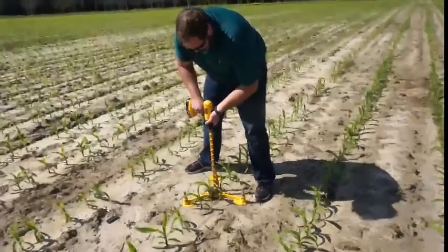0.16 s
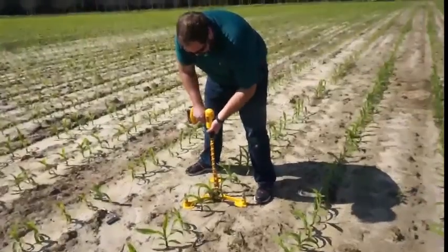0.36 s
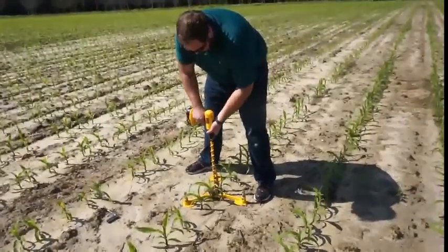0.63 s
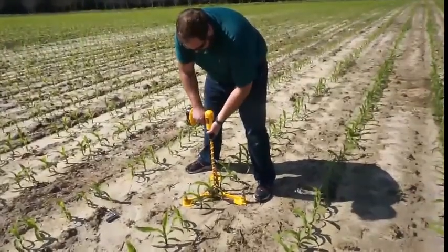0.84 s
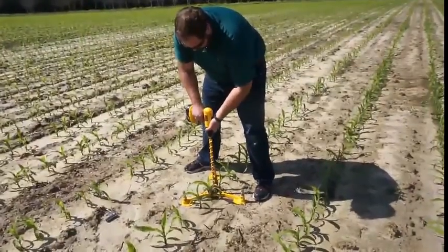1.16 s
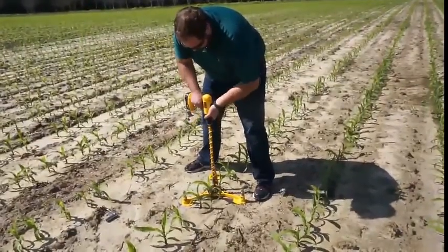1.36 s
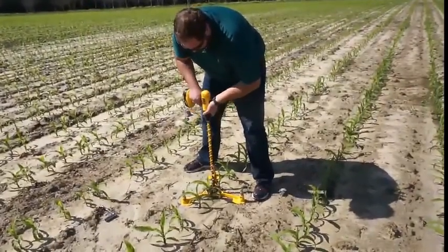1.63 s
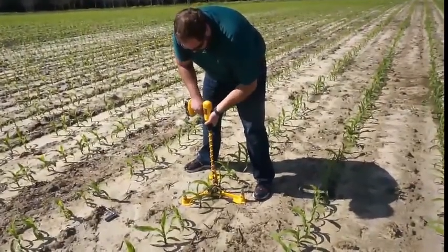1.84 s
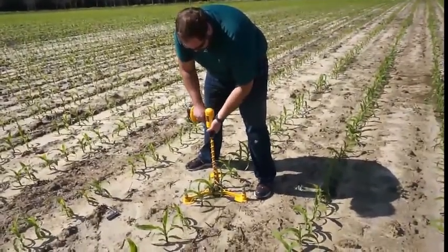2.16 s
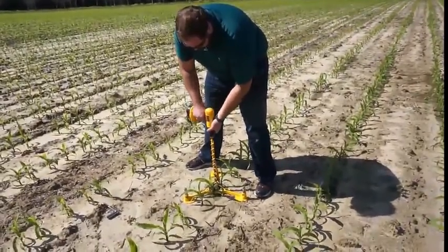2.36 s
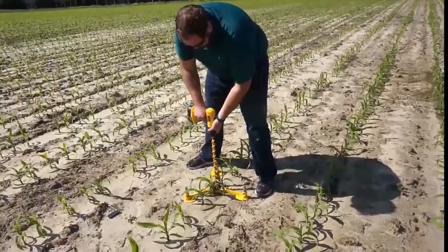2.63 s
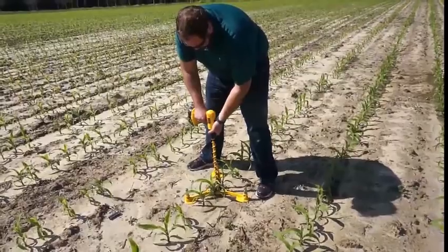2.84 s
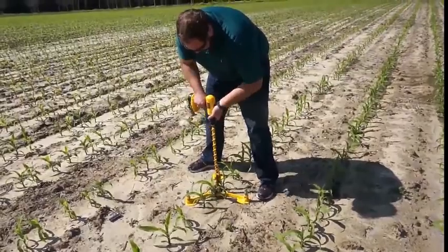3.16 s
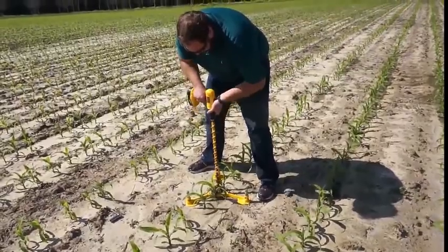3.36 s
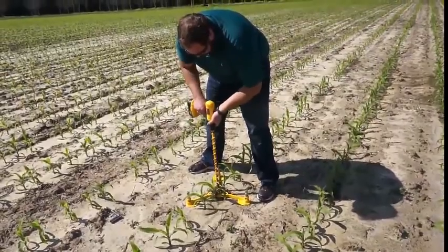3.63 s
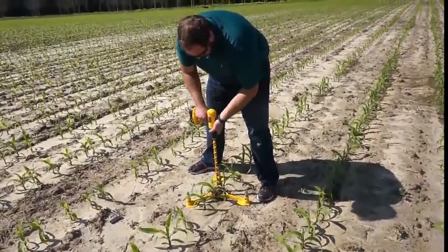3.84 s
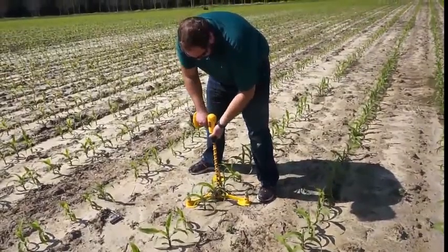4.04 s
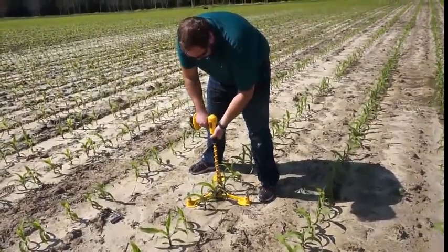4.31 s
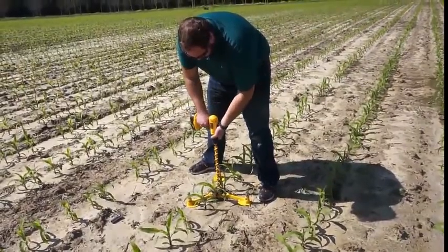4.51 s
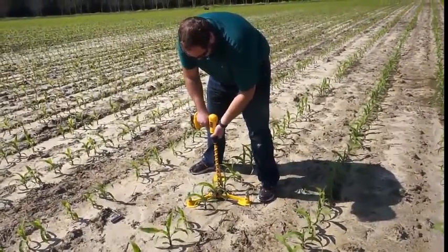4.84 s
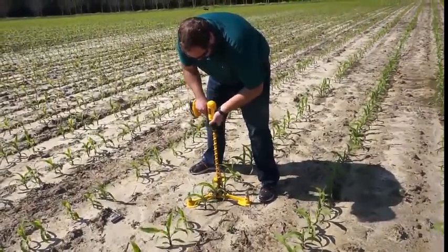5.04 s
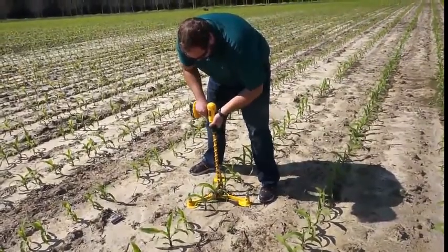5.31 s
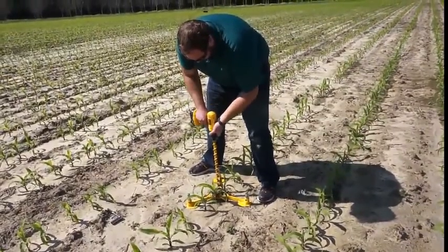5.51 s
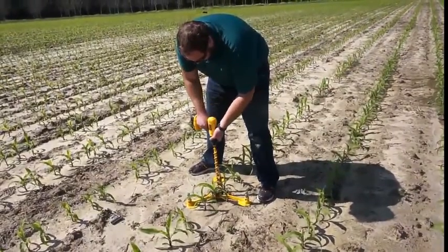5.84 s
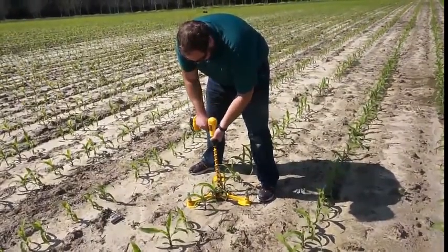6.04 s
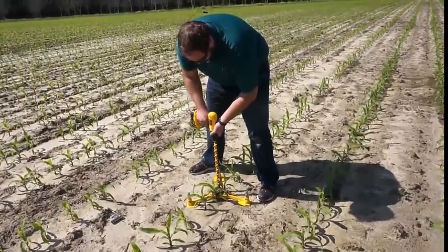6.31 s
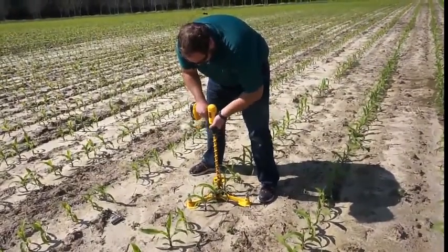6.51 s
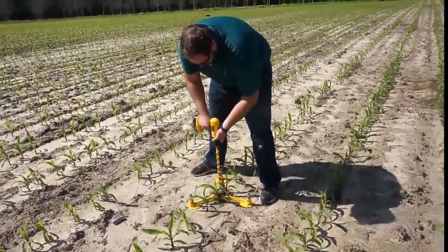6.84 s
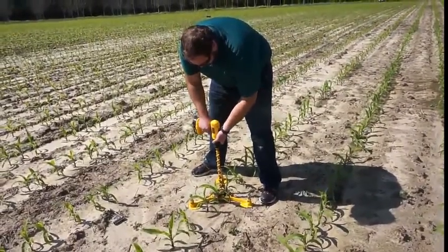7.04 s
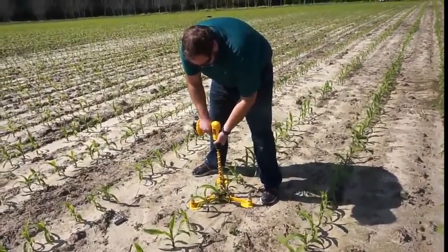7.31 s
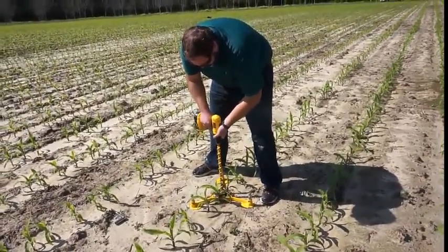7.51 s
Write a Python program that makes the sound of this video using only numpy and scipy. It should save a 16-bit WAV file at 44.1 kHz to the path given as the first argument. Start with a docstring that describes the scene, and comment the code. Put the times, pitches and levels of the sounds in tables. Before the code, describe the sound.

A cordless drill whirs in uneven bursts outdoors, its motor pitch rising and sagging over gritty sand hiss, while low wind buffets the microphone.

```python
"""Auger drill in sand

A few metres from a camera in an open field, a cordless drill turns a long auger into sandy soil in short strokes.
Motor slots and gear teeth sing as sines on multiples of the shaft angle, over filtered noise for brush and sand;
the housing colours them all, and the gears knock now and then as short damped rings.
Two dry noise clicks fall near the start, a thin sine whistle comes and goes, and gusts of low noise buffet
both microphone ports. The camera's gain control ducks after loud peaks."""
import sys
import numpy as np
from scipy import signal
from scipy.fft import rfft, irfft, next_fast_len
from scipy.io import wavfile
from scipy.ndimage import uniform_filter1d, map_coordinates

SR = 44100
rng = np.random.default_rng(int(sys.argv[2]) if len(sys.argv) > 2 else 0)


def digitize_waveform(pressure):
    """Quantize a signal to 16-bit integers and store it at the path in sys.argv[1].

    Rows of a 2-D input are taken as channels; values are limited to [-1, 1].
    """
    field = np.atleast_2d(pressure).T
    bounded = np.clip(field, -1, 1)
    quanta = np.round(bounded * 32767).astype(np.int16)
    wavfile.write(sys.argv[1], SR, quanta)


N = 338247  # samples
START_SPEED = 175  # shaft turns a second
LEFT_RIGHT = np.array([[1], [-1]])  # signs for a level offset between the ports


def amp(db):
    """Decibels to amplitude."""
    return 10 ** (np.asarray(db) / 20)


def unit(x):
    """Scale to an RMS of one."""
    return x / np.sqrt(np.mean(x ** 2) + 1e-20)


def along(points, hz):
    """Read (f/Hz, value) points on a log frequency axis."""
    f, v = np.transpose(points)
    return np.interp(np.log(hz + 1), np.log(f + 1), v)


def curves(rows):
    """One value per sample for each column after the time."""
    s, *cols = np.transpose(rows)
    return [np.interp(np.arange(N) / SR, s, c) for c in cols]


def wobble(rate):
    """A smooth random curve, rate knots a second."""
    coarse = np.arange(0, N, 32)
    knots = rng.standard_normal(int(N * rate / SR) + 4)
    return np.interp(np.arange(N), coarse, map_coordinates(knots, [coarse * rate / SR]))


def filtered(x, response):
    """Multiply the spectrum of x by a function of frequency."""
    m = next_fast_len(x.shape[-1] + 8192)
    return irfft(rfft(x, m) * response(np.fft.rfftfreq(m, 1 / SR)), m)[..., :x.shape[-1]]


def spread(pair, colour, alike, lead):
    """Two unrelated signals become left and right of given likeness and phase lead."""
    m = next_fast_len(pair.shape[1] + 8192)
    hz = np.fft.rfftfreq(m, 1 / SR)
    turn = np.arccos(np.clip(along(alike, hz), -1, 1)) / 2
    mid, side = rfft(pair, m) * colour(hz) * [np.cos(turn), np.sin(turn)]
    shift = np.exp(.5j * along(lead, hz))
    return irfft([(mid + side) * shift, (mid - side) / shift], m)[:, :pair.shape[1]]


def patchy(patchy_db):
    """Two noises that share patches of random gain in time and frequency."""
    z = signal.stft(rng.standard_normal((2, N)), nperseg=512)[2]
    field = uniform_filter1d(rng.standard_normal(z.shape[1:]), 4, 0)
    field = uniform_filter1d(field, 10, 1)
    return unit(signal.istft(z * amp(patchy_db * unit(field)), nperseg=512)[1][:, :N])


def tones(orders, turns, waver_db):
    """Sines on multiples of the shaft angle, each fluttering by itself; two mixes with other phases."""
    out = np.zeros((2, N))
    for k, db in orders:
        flutter_db = waver_db * (wobble(6) + 1.5 * wobble(70))
        tone = amp(db + flutter_db) * np.exp(2j * np.pi * k * turns)
        out += (tone * np.exp(2j * np.pi * rng.random((2, 1)))).real
    return unit(out)


# Drill as it reaches the camera: t/s, level/dB at the starting speed
DRILL_LEVEL = [(0, -40), (.5, -40.5), (.7, -42.5), (1.2, -41.5), (1.7, -39), (2.15, -38.5), (2.7, -39.5),
               (3.05, -39.5), (3.4, -36.5), (4, -36.5), (4.3, -36.5), (4.6, -38), (4.9, -36.5),
               (5.4, -36.5), (6, -37.5), (6.6, -35.5), (7.2, -35), (7.67, -35.5)]
# Tone of the housing: f/Hz, level/dB
HOUSING_TONE = [(600, -47.5), (880, -1), (1100, -1), (1400, 0), (1650, -6), (1900, -7.5), (2500, -5),
                (3600, 1.5), (4800, 0.5), (6300, -1), (8000, -4), (9800, -1.5), (11200, -12)]
# Likeness of the drill at the two ports: f/Hz, likeness 0-1
DRILL_ALIKE = [(800, 1), (1200, 0.14), (2500, 0.67), (5200, 0.75), (10900, 1)]
# Lean of the drill to one side: f/Hz, level/dB of left over right
DRILL_LEAN = [(700, -10.5), (1080, 10), (1900, 0.5), (3440, -0.5), (6120, 3), (10900, -0.5)]
HISS_DB_PER_OCTAVE = 2.5  # the drill's overall level grows with shaft speed


def drill():
    """Slot, gear and chatter tones join pulsing hiss and grind, and leave through the housing."""
    speed, (hum_db, slot_db, mesh_db, second_db, third_db, grind_db) = shaft()
    turns = np.cumsum(speed * (1 + .002 * wobble(70))) / SR
    source = brush_and_sand(turns, grind_db)
    source += filtered(song(speed, turns, hum_db, slot_db, mesh_db), gearbox)
    # the gearbox colours the chatter only a little
    source += filtered(chatter(speed, second_db, third_db), lambda hz: gearbox(hz) ** 0.25)
    colour = lambda hz: amp(along(HOUSING_TONE, hz))
    body = unit(housing_gaps(spread(source, colour, DRILL_ALIKE, lead=[(1, 0)])))
    level_db = curves(DRILL_LEVEL)[0] + HISS_DB_PER_OCTAVE * np.log2(speed / START_SPEED)
    return amp(level_db) * filtered(body, lambda hz: amp(along(DRILL_LEAN, hz) / 2 * LEFT_RIGHT))


# The trigger finger moves or the auger bites: t/s, shaft speed it settles at [turns a second],
# time constant [s], motor pulling 1 or slack 0
TRIGGER_MOVES = [(0.0, 180.8, .04, 1), (.25, 180.3, .1, 1), (0.51, 91, .171, 0), (1.046, 183.5, .144, 1),
                 (1.75, 178.3, .1, 1), (2.095, 43.7, .215, 0), (2.439, 99.5, .23, 0), (2.876, 166, .138, 1),
                 (4.001, 64.7, .186, 0), (4.366, 134.8, .038, 0), (4.659, 155.5, .152, 0),
                 (4.85, 218.2, .105, 1), (5.4, 214, .1, 1), (5.804, 143.2, .108, 0), (6.198, 212, .151, 1),
                 (6.97, 106, .159, 0), (7.365, 308, .267, 1)]
# Parts of the drill after each of those moves, level/dB re hiss before the speed terms and the housing:
# slot hum, slot overtones, gear tone, second chatter overtone, third chatter overtone, low grind
MOVE_VOICING = [(-11, -7, -8.5, -18, -21, 5), (-5, -8, -4, -13, -18, 2.5), (3.5, -16, -10, -12, -12, 2),
                (-5, -8, -13, -30, -30, 2.5), (-8, -7, -6.5, -29, -30, 2.5), (-8, -14, -11, -5, -12, 3.5),
                (-20, -18, -30, -5, -18, 7), (-6, -14, -8, -18, -26, 3), (-10, -16, -11, -13, -15, 2),
                (-12, -16, -10, -8, -8, 4), (-12, -11, -11, -15, -18, 2), (-10.5, -8, -10, -18, -22, 3),
                (-11.5, -11, -15, -22, -25, 3), (-9, -8, -7, -6, -15, 1.5), (-8, -8, -13, -20, -24, 3.5),
                (-9.5, -11, -9, -5, -16, 2), (-9, -9, -9, -17, -20, 1)]
# the teeth go slack or take up load this long after a move, blended over this time
SLACK_LAG_S, TAKE_UP_S, SLACK_BLEND_S = .05, .09, .06


def shaft():
    """Speed glides to each new setting like a critically damped mass; also the part levels."""
    t, speed = np.arange(N) / SR, np.zeros(N)
    now, slope = START_SPEED, 0
    starts = [row[0] for row in TRIGGER_MOVES]
    for (s, goal, tau, *_), end in zip(TRIGGER_MOVES, starts[1:] + [N / SR]):
        push = slope + (now - goal) / tau
        glide = lambda d: goal + (now - goal + push * d) * np.exp(-d / tau)
        span = (t >= s) & (t < end)
        speed[span] = glide(t[span] - s)
        length = end - s
        now, slope = glide(length), (slope - push * length / tau) * np.exp(-length / tau)
    changes = [row[0] + (TAKE_UP_S if row[3] else SLACK_LAG_S) for row in TRIGGER_MOVES]
    row = np.clip(np.searchsorted(changes, t) - 1, 0, None)
    part_db = np.array(MOVE_VOICING, float)[row].T
    part_db = uniform_filter1d(part_db, max(round(SLACK_BLEND_S * SR), 1), mode="nearest")
    return np.maximum(speed, 1), part_db


# Overtones of the five armature slots: multiple of the shaft, level/dB
SLOT_OVERTONES = [(10, -6), (15, 1), (20, 3.5), (25, 0.5), (30, -3.5), (35, 0), (40, 3), (45, 2.5), (50, 0),
                  (55, -2), (60, 3)]
# Twelve-tooth pinion with a sideband and a second gear: multiple of the shaft, level/dB
GEAR_MESH = [(7, -8), (12, 0), (12.55, -4), (17, -20)]
MESH_DB_PER_OCTAVE = 9  # the gear tone grows with shaft speed


def song(speed, turns, hum_db, slot_db, mesh_db):
    """Armature slots and meshing gears sing at multiples of the shaft speed."""
    # 1 when the speed changes by 150 turns a second each second
    gliding = np.abs(uniform_filter1d(np.gradient(speed), SR // 20)) * SR / 150
    mesh_db = mesh_db + MESH_DB_PER_OCTAVE * np.log2(speed / START_SPEED)
    out = amp(hum_db) * tones([(5, 0)], turns, waver_db=1.5)
    # slot overtones fade while the speed glides
    out += amp(slot_db - 4.5 * gliding) * tones(SLOT_OVERTONES, turns, waver_db=1.5)
    return out + amp(mesh_db) * tones(GEAR_MESH, turns, waver_db=1.5)


# Chattering teeth, a list for the second overtone and one for the third and up:
# multiple of the shaft, level/dB
TOOTH_CHATTER = [(23.3, -9), (24, 0), (24.6, -4), (25.2, -10)], [(35.3, -10), (36, 0), (48, -9)]
CHATTER_DB_PER_OCTAVE = -8  # slack teeth rattle harder as the shaft slows


def chatter(speed, second_db, third_db):
    """Chattering teeth on an unsteady shaft: a broad second overtone and thinner higher ones."""
    slowing_db = CHATTER_DB_PER_OCTAVE * np.log2(speed / 130)
    loaded = np.cumsum(speed * (1 + .01 * wobble(140))) / SR
    firm = np.cumsum(speed * (1 + .007 * wobble(100))) / SR
    second, third = TOOTH_CHATTER
    out = amp(second_db + slowing_db) * tones(second, loaded, waver_db=2.0)
    return out + amp(third_db + slowing_db) * tones(third, firm, waver_db=2.0)


# Gearbox resonances that lift a tone passing through: f/Hz, width/Hz, level/dB re the flat part
GEARBOX_RINGS = [(910, 1000, -27), (2540, 580, 2.5), (3900, 120, -17), (5004, 260, 18), (6260, 330, 11),
                 (10090, 560, 13)]


def gearbox(hz):
    """Gain of the gearbox: resonant peaks on a flat floor."""
    peaks = [amp(db) / 2 / (1 + (2 * (hz - c) / w) ** 2) for c, w, db in GEARBOX_RINGS]
    return 0.5 + sum(peaks)


def brush_and_sand(turns, grind_db):
    """Brush and sand hiss pulses with the shaft and with sand grains; patchier grinding lies below it."""
    beat = 1 + 0.035 * np.cos(2 * np.pi * turns)
    grains = amp(0.54 * wobble(300) + 0.32 * wobble(16))
    noise = unit(patchy(patchy_db=2.5) * beat * grains)
    lows = lambda hz: 1 / (1 + (hz / 3200) ** 12)
    hiss = filtered(noise, lambda hz: 1 - lows(hz))
    return hiss + amp(grind_db) * filtered(patchy(patchy_db=4.0), lows)


# Gaps from ground and body echoes with the drill held high: f/Hz, width/Hz
HIGH_GAPS = [(760, 130), (1110, 200), (2010, 80), (2720, 90), (3130, 380), (5650, 80), (7450, 130),
             (8400, 110), (9350, 80), (10350, 125)]
# The same gaps with the drill sunk low: f/Hz, width/Hz
LOW_GAPS = [(740, 130), (1110, 160), (2060, 90), (2800, 130), (3340, 290), (5800, 90), (6950, 170),
            (7900, 90), (8900, 230), (10300, 60)]
# Drill sinking into the ground: t/s, share of the low position 0-1
SINK_PATH = [(0, 0.1), (2.2, 0.2), (3.4, 1), (7.67, 0.96)]


def housing_gaps(x):
    """Dark gaps where two paths cancel; they slide as the drill sinks and sway as it rocks."""
    hz, t, z = signal.stft(x, SR, nperseg=1024)
    at = np.minimum(np.round(t * SR).astype(int), N - 1)
    low = np.clip(curves(SINK_PATH)[0][at], 0, 1)
    for (high_hz, high_w), (low_hz, low_w) in zip(HIGH_GAPS, LOW_GAPS):
        centre = high_hz + low * (low_hz - high_hz) + 45 * wobble(6)[at]
        width = (high_w + low * (low_w - high_w)) * amp(2.2 * wobble(12)[at])
        depth = np.clip(1.2 + .4 * wobble(8)[at], 0, 1)  # the gap varies in depth
        z = z * (1 - depth / (1 + (2 * (hz[:, None] - centre) / width) ** 6))
    return signal.istft(z, SR, nperseg=1024)[1][:, :N]


# Short knocks in the gear train: t/s, level/dB before onset, decay and lean, f/Hz
GEAR_KNOCKS = [(0.559, -7, 856), (2.13, -8, 956), (4.001, -7, 980), (4.498, -10.5, 1456), (4.8, -16, 910)]


def knocks():
    """Each knock is one damped ring with a soft start, a little stronger on the left."""
    out, t = np.zeros(N), np.arange(SR // 10) / SR
    for s, db, hz in GEAR_KNOCKS:
        decay = amp(db - 60 * t / 0.02)  # 60 dB in 20 ms
        out[round(s * SR):][:len(t)] += decay * (1 - np.exp(-t / 0.019)) * np.sin(2 * np.pi * hz * t)
    return out * amp(1.5 * LEFT_RIGHT)


# Dry clicks: t/s, peak level/dB on the right, brightness [dB an octave]
DRY_CLICKS = [(0.0635, -5.5, 1), (0.285, -12, -2)]
# Spectrum of a click before its brightness: f/Hz, level/dB per Hz
CLICK_TONE = [(400, -35), (800, -9), (1200, -7), (1850, -23), (2750, -6), (3450, -27), (4300, -5.5),
              (5600, -2), (6900, -3), (8000, -19), (9550, -2), (11000, -30), (14600, -55), (22000, -120)]
CLICK_LEFT_DB = -8  # re right: the clicks fall near the right port


def clicks():
    """Dry noise snaps that swell for under a millisecond and die in three."""
    out, t = np.zeros((2, N)), np.arange(SR // 50) / SR
    lead_in = 200  # samples of room for the filter before the click
    for s, db, bright_db in DRY_CLICKS:
        burst = rng.standard_normal((2, len(t))) * (t / .0007) ** 2 * np.exp(-t / 0.0004)
        burst = np.pad(burst, ((0, 0), (lead_in, 0)))
        colour = lambda hz: amp(along(CLICK_TONE, hz) + bright_db * np.log2((hz + 1) / 4000))
        burst = filtered(burst, colour)
        burst = burst / abs(burst).max(1, keepdims=True) * amp([[CLICK_LEFT_DB], [0]])
        out[:, round(s * SR) - lead_in:][:, :burst.shape[1]] += amp(db) * burst
    return out


# Thin whistle: t/s, f/Hz, level/dB
WHISTLE_PATH = [(0.0, 4260, -42), (0.06, 4260, -43.5), (0.08, 4223, -59), (0.38, 4239, -53.5),
                (0.7, 4250, -56.5), (1.3, 4190, -52), (1.34, 4200, -60), (1.56, 4270, -44),
                (1.73, 4180, -53), (2.01, 4230, -49), (2.05, 4220, -59), (2.84, 4280, -57),
                (2.95, 4185, -42), (3.29, 4340, -53.5), (3.53, 4310, -48), (3.61, 4234, -71),
                (3.82, 4270, -48), (3.87, 4220, -53), (4.02, 4260, -47), (4.66, 4207, -44),
                (4.89, 4200, -59), (4.98, 4230, -39), (5.02, 4170, -50), (5.57, 4259, -67),
                (5.72, 4210, -50), (6.77, 4190, -53.5), (6.81, 4140, -41), (6.92, 4160, -60),
                (7.26, 4130, -51), (7.35, 4179, -61), (7.41, 4160, -39.5), (7.58, 4190, -54),
                (7.61, 4180, -40), (7.67, 4169, -49)]


def whistle():
    """A thin flickering sine that keeps near its pitch whatever the shaft does."""
    hz, db = curves(WHISTLE_PATH)
    tone = np.sqrt(2) * np.sin(2 * np.pi * np.cumsum(hz + 9 * wobble(16)) / SR)
    flicker = unit(amp(2.9 * wobble(25)))
    return amp(db) * flicker * tone * amp(.6 * LEFT_RIGHT)


# Breeze over the field: t/s, level/dB, brightness of the eddies [dB an octave]
BREEZE_PATH = [(0, -21, 2), (.15, -23, 0), (1.1, -30, -4), (1.5, -24, 1.5), (1.9, -28, 1), (2.5, -30, -3.5),
               (2.95, -26.5, 3), (3.15, -33, -10), (3.85, -31.5, -2.5), (4.05, -25.5, -1),
               (4.75, -26.5, -1), (5.3, -33, -0.5), (5.6, -35.5, -0.5), (6.15, -30.5, -5), (6.45, -44, -11),
               (7.1, -27.5, -7), (7.4, -34.5, -7), (7.67, -33.5, 4)]
# Spectrum of the rumble before its low-pass filters: f/Hz, level/dB per Hz
RUMBLE_TONE = [(12, -22), (20, -16), (87, 0), (193, -2), (251, -5), (481, -15), (552, -12.5), (686, -25),
               (800, -73), (1040, -76), (1760, -120)]
# Wind at the two ports: f/Hz, left-right likeness 0-1
WIND_ALIKE = [(30, 0.88), (70, 0.7), (130, 0.55), (270, 0.72), (550, 0.84)]
# Wind crossing the ports: f/Hz, phase by which the left port leads [radians]
WIND_LEAD = [(40, 0), (75, -.25), (130, -1.3), (300, -2.3), (690, -2.7)]
DEEP_FOLLOWS = 0.22  # share of the breeze's dB swing that the deepest rumble follows


def wind():
    """A low rumble whose upper part comes in lumps, and short eddies that hit the ports out of step."""
    breeze_db, tilt_db = curves(BREEZE_PATH)
    colour = lambda hz: amp(along(RUMBLE_TONE, hz)) / (1 + (hz / 520) ** 8)
    rumble = unit(spread(rng.standard_normal((2, N)), colour, WIND_ALIKE, WIND_LEAD))
    deep = filtered(rumble, lambda hz: 1 / (1 + (hz / 85) ** 4))
    lumps = unit(amp(np.minimum(3.55 * wobble(16) + 3.35 * wobble(35), 6)))
    steadying = amp((DEEP_FOLLOWS - 1) * (breeze_db - breeze_db.mean()))
    out = amp(breeze_db) * (steadying * deep + lumps * (rumble - deep))
    out += eddies(breeze_db, tilt_db)
    return filtered(out, lambda hz: 1 / (1 + (hz / 760) ** 10))


# Eddies at set moments: t/s, level/dB before lean and low-pass, length/s
SET_EDDIES = [(0.05, -19, 0.037), (0.091, -13.5, 0.034), (0.292, -21, 0.022), (0.351, -16, 0.018),
              (0.459, -25, 0.04), (0.519, -14, 0.077), (0.688, -19, 0.027), (0.784, -18.5, 0.017),
              (1.078, -19, 0.052), (1.148, -25, 0.012), (1.402, -20, 0.033), (1.44, -25, 0.03),
              (1.544, -19, 0.048), (1.85, -22.5, 0.028), (1.886, -22, 0.025), (2.335, -22, 0.025),
              (2.488, -18.5, 0.025), (2.556, -29, 0.031), (2.663, -19, 0.03), (2.724, -25.5, 0.033),
              (2.831, -16.5, 0.028), (2.866, -21, 0.016), (3.026, -17, 0.034), (3.087, -23.5, 0.034),
              (3.183, -29, 0.013), (3.368, -26, 0.047), (3.501, -20.5, 0.028), (3.925, -25.5, 0.024),
              (4.015, -20, 0.021), (4.074, -23.5, 0.037), (4.133, -18.5, 0.051), (4.237, -23, 0.025),
              (4.295, -26.5, 0.018), (4.354, -23, 0.035), (4.399, -34, 0.016), (4.515, -17.5, 0.017),
              (4.565, -15.5, 0.038), (4.646, -18.5, 0.023), (4.749, -17.5, 0.014), (4.79, -19.5, 0.025),
              (5.116, -19, 0.019), (5.175, -21.5, 0.025), (5.218, -14.5, 0.064), (5.505, -15, 0.094),
              (5.581, -15, 0.074), (5.631, -19.5, 0.028), (5.806, -28.5, 0.036), (5.972, -36, 0.017),
              (6.075, -26, 0.034), (6.128, -26.5, 0.018), (6.168, -24, 0.054), (6.735, -23.5, 0.023),
              (7.023, -22.5, 0.039), (7.1, -23, 0.029), (7.433, -21, 0.028)]
# Spectrum of an eddy before its brightness: f/Hz, level/dB per Hz
EDDY_TONE = [(41, -27.5), (70, -10), (113, -7.5), (188, -0.5), (380, -6.5), (502, -11.5), (732, -24.5),
             (895, -21), (1000, -14), (1300, -105), (2200, -120)]
BRIGHT_SCATTER_DB, PAN_SCATTER_DB = 3, 4.5  # from eddy to eddy: dB an octave, dB left over right
CREST_DB, SPIKY_DB = 7.5, 4.5  # peak of an eddy over its level; spread of its few sharp pushes


def eddies(breeze_db, tilt_db):
    """Each eddy is an arch of low noise made of a few sharp pushes."""
    out, t = np.zeros((2, N)), np.arange(4000) / SR
    for s, db, length in [*SET_EDDIES, *small_eddies(breeze_db, count=130)]:
        scatter = rng.standard_normal(2)
        bright_db = tilt_db[round(s * SR)] + BRIGHT_SCATTER_DB * scatter[0]
        pan_db = PAN_SCATTER_DB * scatter[1]
        tilt = lambda hz: bright_db * np.log2(np.clip(hz, 110, 800) / 200)
        colour = lambda hz: amp(along(EDDY_TONE, hz) + tilt(hz))
        shape = np.sin(np.pi * np.clip(t / max(length, .008), 0, 1)) ** 0.54
        pushes = amp(SPIKY_DB * unit(uniform_filter1d(rng.standard_normal(len(t)), size=100)))
        noise = pushes * rng.standard_normal((2, len(t)))
        puff = shape * spread(noise, colour, WIND_ALIKE, WIND_LEAD)
        puff *= amp(CREST_DB) / abs(puff).max(1, keepdims=True)
        start = max(round((s - .004) * SR), 0)
        out[:, start:start + len(t)] += amp(db + pan_db / 2 * LEFT_RIGHT) * puff[:, :N - start]
    return out


# small eddies: level re breeze, its scatter, length
SMALL_DB, SMALL_SCATTER_DB, SMALL_S = -2, 3.5, 0.0133


def small_eddies(breeze_db, count):
    """Short eddies at random moments, with levels scattered about one that follows the breeze."""
    times = rng.random(count) * (N - 1) / SR
    levels_db = SMALL_DB + SMALL_SCATTER_DB * rng.standard_normal(count)
    return [(s, breeze_db[round(s * SR)] + db, SMALL_S) for s, db in zip(times, levels_db)]


def scene():
    """Everything that reaches the two ports."""
    return drill() + knocks() + clicks() + whistle() + wind()


DUCK_ABOVE_DB, DUCK_SLOPE = -10, 1.3  # threshold; dB of ducking for each dB over it
DUCK_ATTACK_S, RECOVER_DB_PER_S = 0.004, 35
TOP_HZ = 10820  # band limit


def record(dry):
    """Gain control ducks just after loud peaks and climbs back steadily; a steep low-pass limits the band."""
    over_db = DUCK_SLOPE * np.maximum(20 * np.log10(abs(dry).max(0) + 1e-9) - DUCK_ABOVE_DB, 0)
    climb_db = RECOVER_DB_PER_S * np.arange(N) / SR
    duck_db = np.maximum.accumulate(over_db + climb_db) - climb_db
    lag = max(round(DUCK_ATTACK_S * SR), 2)
    duck_db = uniform_filter1d(duck_db, lag, origin=(lag - 1) // 2)
    return filtered(dry * amp(-duck_db), lambda hz: 1 / (1 + (hz / TOP_HZ) ** 400))


dry = scene()
out = record(dry)
digitize_waveform(out)
```